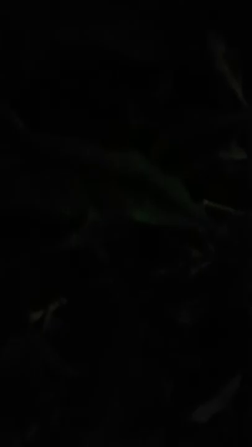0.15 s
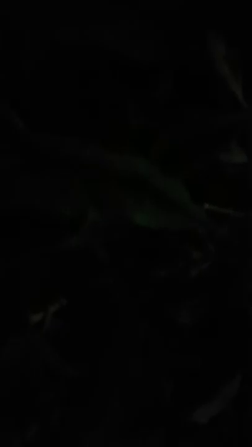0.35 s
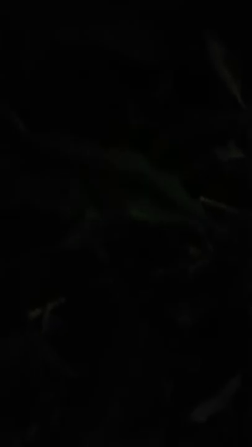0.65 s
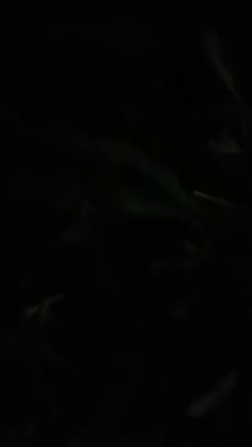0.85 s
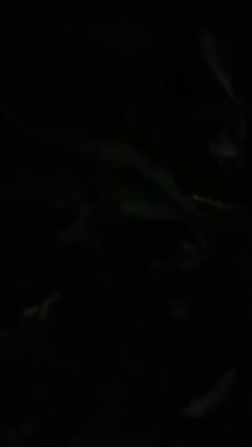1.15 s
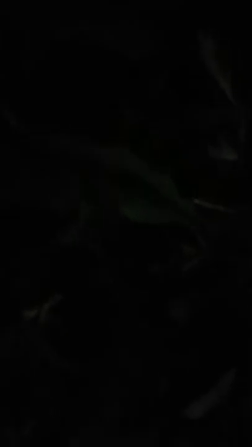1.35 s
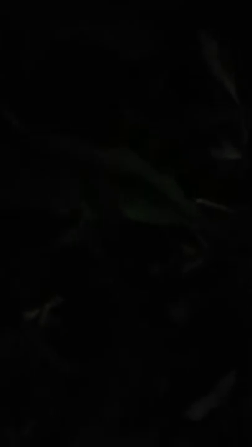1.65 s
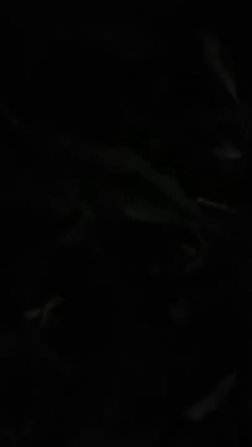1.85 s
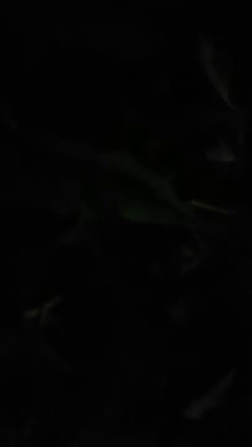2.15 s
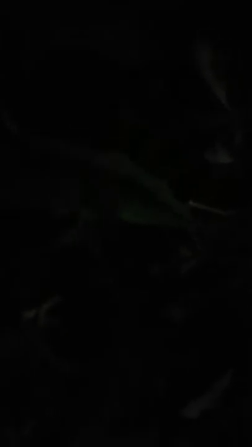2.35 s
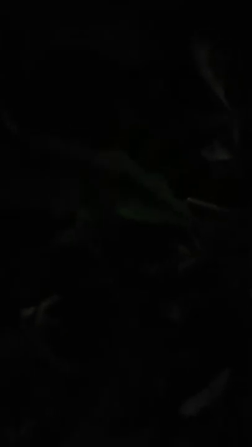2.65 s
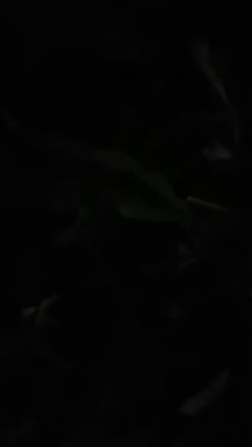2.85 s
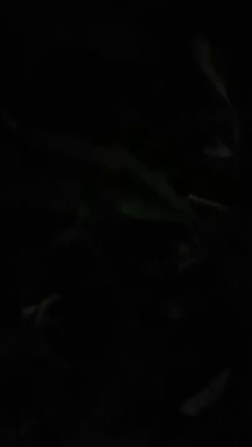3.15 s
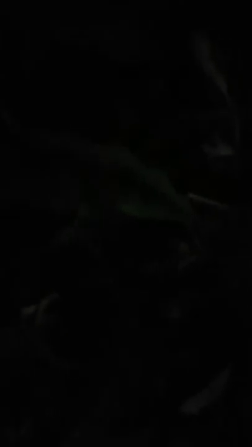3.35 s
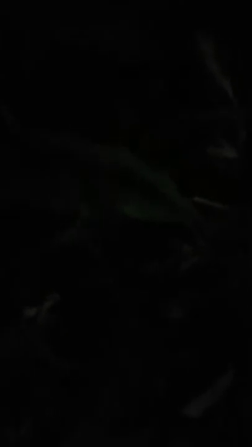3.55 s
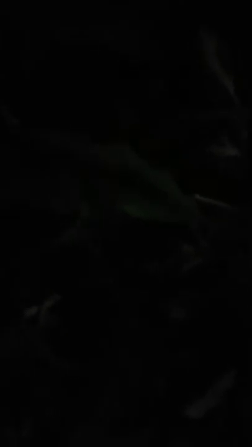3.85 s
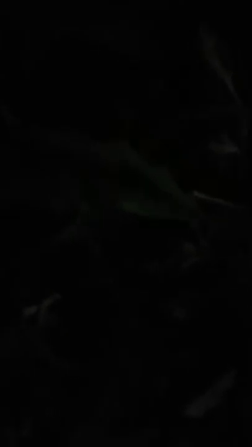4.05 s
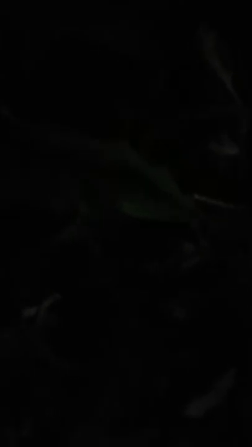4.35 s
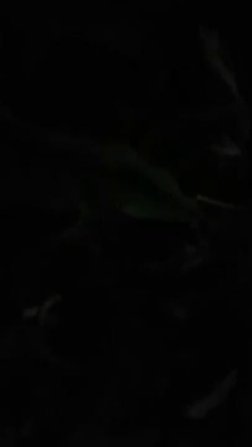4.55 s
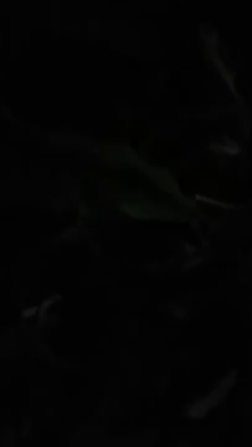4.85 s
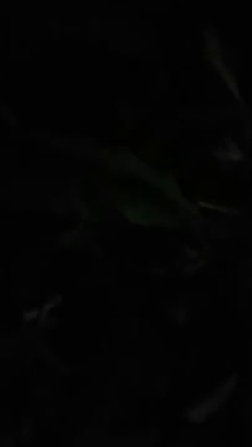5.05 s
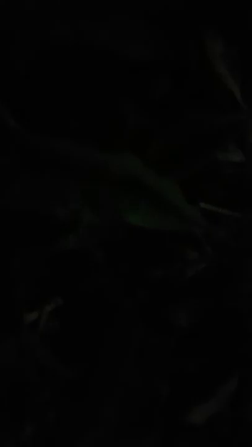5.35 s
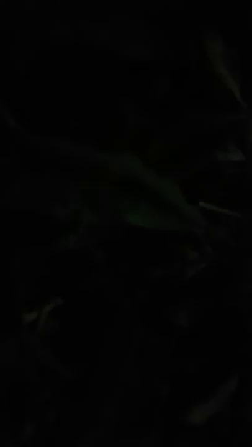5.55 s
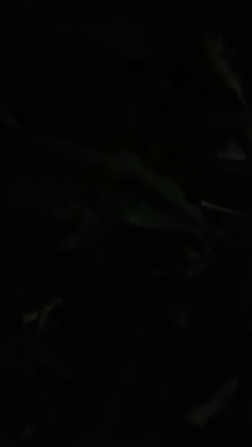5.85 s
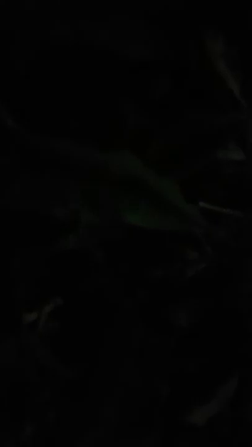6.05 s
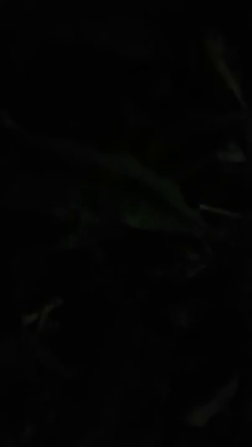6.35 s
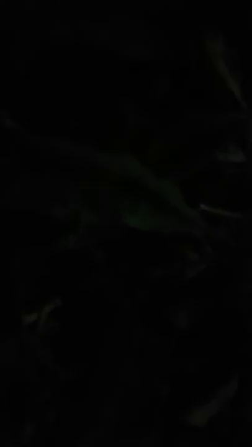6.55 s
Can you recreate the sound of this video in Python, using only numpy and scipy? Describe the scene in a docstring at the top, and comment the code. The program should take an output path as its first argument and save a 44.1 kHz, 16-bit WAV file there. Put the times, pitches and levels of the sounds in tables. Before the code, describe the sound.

Outdoors at night, about sixteen tree frogs call close by, each repeating a short low chirp then a longer, arching high whistle roughly once a second. Countless distant frogs blur into a shimmering wash behind them. A thin insect trill, soft air hiss and low motor hum continue throughout; one small dull tap comes early. Two close microphones give a wide, nearly dry stereo picture, with the high notes leaning right.

```python
"""Tree frogs at night

Each frog sings two whistled notes: a short low "co", then a longer, arching high "qui".
Sixteen frogs call near by and many more far off, blurring into a faint wash; all are gliding tones.
A thin insect trill, the hiss of the air and a distant rumble are shaped noise; motors hum as steady tones.
Short whistles, low hoots, one small tap and two passing drones join in, heard by two close microphones."""
import sys
import numpy as np
from scipy import signal
from scipy.fft import rfft, irfft, next_fast_len
from scipy.io import wavfile
from scipy.ndimage import map_coordinates

SR = 44100
rng = np.random.default_rng(int(sys.argv[2]) if len(sys.argv) > 2 else 0)


def master(y):
    """Save y as 16-bit WAV."""
    cut = np.clip(np.atleast_2d(y).T, -1, 1)
    pcm = np.round(cut * 32767)  # scale
    wavfile.write(sys.argv[1], SR, pcm.astype(np.int16))


N = 295029  # length of the scene in samples
SIDES = np.array([[.5], [-.5]])  # shares a left-right difference between left and right


def amp(db):
    """Turn decibels into a multiplier."""
    return 10 ** (np.asarray(db) / 20)


def unit(x):
    """Scale a sound to an rms of 1."""
    return x / np.sqrt(np.mean(x ** 2) + 1e-20)


def along(points, hz):
    """Read a curve of (Hz, value) points, joined by straight lines on a log frequency axis."""
    f, value = np.transpose(points)
    return np.interp(np.log(hz + 1), np.log(f + 1), value)


def wobble(rate, size=N):
    """A smooth random curve with `rate` random points a second."""
    knots = rng.standard_normal(int(size * rate / SR) + 4)
    coarse = np.arange(0, size, 64)
    smooth = map_coordinates(knots, [coarse * rate / SR])
    return np.interp(np.arange(size), coarse, smooth)


def flutter(rate, size):
    """A random zigzag with `rate` random points a second."""
    knots = rng.standard_normal(int(size * rate / SR) + 2)
    return np.interp(np.arange(size) * rate / SR, np.arange(len(knots)), knots)


def filtered(x, response):
    """Make each frequency of a sound stronger or weaker, as `response` tells."""
    m = next_fast_len(N + SR // 2)
    spectrum = rfft(x, m) * response(np.fft.rfftfreq(m, 1 / SR))
    return irfft(spectrum, m)[..., :N]


def add(track, s, sound):
    """Mix a sound into the track at time s, dropping what falls outside."""
    start = round(s * SR)
    a, b = max(start, 0), min(start + sound.shape[-1], N)
    if b > a:
        track[:, a:b] += sound[..., a - start:b - start]


# How alike the noise is at the two microphones: (f/Hz, likeness from 0 to 1)
LIKENESS = [(150, 0.96), (300, .74), (550, 0.62), (1100, 0), (3000, 0.37)]


def rush(spectrum):
    """Stereo noise of rms 1: a shared part and an opposed part make it most alike in the bass."""
    def turn(hz):
        return np.arccos(np.clip(along(LIKENESS, hz), -1, 1)) / 2

    def shape(hz):
        return amp(along(spectrum, hz)) * [np.cos(turn(hz)), np.sin(turn(hz))]

    mid, side = filtered(rng.standard_normal((2, N)), shape)
    return unit(np.array([mid + side, mid - side]))


def rasp(size, low_hz=3900, high_hz=4900):
    """A short stereo puff of noise from one band of pitches, rms 1."""
    m = next_fast_len(size)
    offset = (2 * np.fft.rfftfreq(m, 1 / SR) - low_hz - high_hz) / (high_hz - low_hz)
    spectrum = rfft(rng.standard_normal((2, m))) / (1 + offset ** 4)
    return unit(irfft(spectrum, m)[:, :size])


def leaves(x, t60=.07):
    """Foliage close by returns each call within a few hundredths of a second, so gliding notes beat."""
    t = np.arange(SR // 10) / SR
    tail = rng.standard_normal((2, len(t))) * amp(-60 * t / t60) * (t > .003)
    return signal.fftconvolve(x, tail / np.linalg.norm(tail[0]), axes=1)[:, :N]


def trees(x, t60):
    """Trunks and leaves scatter a short diffuse tail, different at each microphone; t60 = s to fall 60 dB."""
    t = np.arange(SR // 2) / SR
    build_up = 1 - np.exp(-t / .024)
    tail = rng.standard_normal((2, len(t))) * amp(-60 * t / t60) * build_up
    return signal.fftconvolve(x.mean(0)[None], tail / np.linalg.norm(tail[0]), axes=1)[:, :N]


def whistle(pitch_hz, envelope, overtones, pan_db, lead_ms, jitter=.0008, shimmer_db=.7, flutter_db=4.5):
    """A vocal sac rings as a nearly pure tone with fluttering overtones; a lead puts one microphone first."""
    size = len(pitch_hz)
    hz = pitch_hz * (1 + jitter * flutter(150, size=size))
    lead_cycles = SIDES * hz * lead_ms / 1000
    phase = 2 * np.pi * (np.cumsum(hz) / SR + lead_cycles)
    tone = np.sin(phase)
    for multiple, db in overtones:
        strength = amp(db + flutter_db * flutter(170, size=size))
        tone = tone + strength * np.sin(round(multiple) * phase)
    shimmer = amp(shimmer_db * flutter(94, size=size))
    return tone * envelope * amp(SIDES * pan_db) * shimmer


# Low-note overtones, before strain and voice change them: (multiple of the pitch, level/dB below the pitch)
LOW_OVERTONES = [(2, -28), (3, -34), (5, -49)]


def co(length, hz, db, pan_db, lead_ms, sag, flick, overtone_db, hook=.025, fade_db=3.5, attack=.0095,
       choke_db=17, strain_db=5, rasp_db=-32, vary=.45):
    """The low note starts abruptly, sags, hooks up and is choked off in an upward flick; each one varies."""
    flick_time, overrun = .013, .004  # s
    t = np.arange(int((length + overrun) * SR)) / SR
    u = np.minimum(t / length, 1)  # progress through the note, 0 to 1
    left = t[-1] - t
    closing = np.maximum(1 - left / flick_time, 0)  # climbs to 1 during the flick

    slack, force = 1 + vary * rng.uniform(-1, 1, 2)
    sagging = slack * sag * (1 - u) ** 2
    pitch = hz * (1 + sagging + hook * u ** 5 + force * flick * closing ** 2)

    edges = np.clip(np.minimum(t / attack, left / .0015), 0, 1)
    gate = np.sin(np.pi / 2 * edges) ** 2
    envelope = gate * amp(db - fade_db * u - choke_db * closing ** 3)

    overtones = []
    for multiple, level in LOW_OVERTONES:
        # the octave gains on the others in the flick
        change = strain_db * closing if multiple < 3 else overtone_db - strain_db * closing
        overtones.append((multiple, level + change))
    tone = whistle(pitch, envelope, overtones, pan_db, lead_ms, jitter=.003, shimmer_db=1.7)
    rasp_level = amp(db + rasp_db + pan_db * SIDES) * np.sin(np.pi * closing)
    return tone + rasp_level * rasp(len(t))


# High-note overtones, before they flutter: (multiple of the pitch, level/dB below the pitch)
HIGH_OVERTONES = [(2, -46), (3, -58)]


def qui(length, hz, db, pan_db, lead_ms, scoop, droop, swell_db, roundness, sweep, edge=.008, sweep_db=-16):
    """The high note sweeps up to pitch from far below, swells along an arch, droops and dies away."""
    sweep_time = .022  # s
    t = np.arange(int(length * SR)) / SR
    u = t / length  # progress through the note, 0 to 1
    opening = np.maximum(1 - t / sweep_time, 0)  # falls to 0 during the sweep
    arch = 1 - scoop * (1 - u) ** 4 - droop * u ** 5
    pitch = hz * (arch - rng.uniform(.85, 1.15) * sweep * opening ** 3)

    onset = (1 - np.exp(-t / edge)) ** 2
    body = np.sin(np.pi * u) ** roundness * onset * amp(swell_db * (u - .5))
    start = amp(sweep_db) * np.sqrt(opening)  # the tone is already there, weakly, during the sweep
    edges = np.clip(np.minimum(t / .003, (length - t) / .006), 0, 1)
    gate = np.maximum(body, start) * edges
    return whistle(pitch, amp(db) * gate, HIGH_OVERTONES, pan_db, lead_ms)


def far_frogs(count=170, co_hz=2200, qui_hz=4000, co_db=-46, qui_db=-42.5, pan_db=-3, echo_db=-5,
              scoop=.03, droop=.018, flick=.08):
    """Many more frogs call at random; bigger ones sing both notes lower and hardly flick."""
    size_spread, level_spread_db = .033, 4
    low, high = np.zeros((2, N)), np.zeros((2, N))
    starts = (np.arange(count) + rng.random(count)) / count * (N / SR + .5) - .5  # s
    # smallness, loudness, side, pace and lilt each run from -1 to 1
    for s, (small, loud, side, pace, lilt) in zip(starts, rng.uniform(-1, 1, (count, 5))):
        scale = 1 + size_spread * (small + small ** 3)
        place = level_spread_db * loud, pan_db + 6 * side, .31 * side  # level dB, left-right dB, lead ms
        low_length, high_length = .052 + .018 * pace, .18 + .026 * pace  # s
        sag, sweep = .025 * (1 + lilt), .04 * (1 + lilt)
        add(low, s, co(low_length, co_hz * scale, *place, sag, flick * (1 + small) / 2, 0))
        high_note = qui(high_length, qui_hz * scale, *place, scoop, droop, 0, .6, sweep)
        add(high, s + low_length, high_note)
    frogs = amp(co_db) * unit(low) + amp(qui_db) * unit(high)
    return frogs + amp(echo_db) * trees(frogs, t60=.6)


# Spectrum of calls blurred by distance: (f/Hz, relative level/dB per Hz)
FAR_CALL_SPECTRUM = [(1900, -44), (2050, -2), (2220, -5), (2400, -16), (2650, -31.5), (3300, -32),
                     (3680, -3.5), (3950, -9), (4250, -13), (4500, -7.5), (4850, -42)]


def farthest_frogs(db=-54, pan_db=-3, swell_db=2):
    """Deep in the trees the calls merge into a faint flickering noise around the two note pitches."""
    level = amp(db + swell_db * wobble(22) + pan_db * SIDES)
    return level * rush(FAR_CALL_SPECTRUM)


# Spectrum of the insect trill: (f/Hz, relative level/dB per Hz)
TRILL_SPECTRUM = [(7000, -24), (7550, -20), (7800, -6), (7915, 0), (8080, -17), (8165, 0.5), (8240, -5),
                  (8330, -24), (8800, -46)]


def insects(db=-67.5, pan_db=-8, flutter_db=1.2):
    """A thin trill of many insects, off to the right: fluttering noise in a narrow high band."""
    level = amp(db + flutter_db * wobble(18) + pan_db * SIDES)
    return level * rush(TRILL_SPECTRUM)


# Steady tones of the motors: (f/Hz, rms level/dB before it wavers)
HUM_LINES = [(59, -66.5), (129, -60.5), (169, -52.5), (236, -62.5), (279, -64), (354, -67.5), (1070, -78)]
# Spectrum of the rumble under them: (f/Hz, relative level/dB per Hz)
RUMBLE_SPECTRUM = [(15, -56), (25, -27), (54, -1.5), (119, -2), (139, -8), (170, -1.5), (203, -4.5),
                   (230, -9.5), (312, -14), (347, -14), (563, -14), (805, -19), (1800, -24), (2340, -65),
                   (3960, -120)]


def machinery(waver_db=2, drift=.8, rumble_db=-48):
    """Distant motors: hum tones, wavering in level and drifting in phase (rad), over low rumbling noise."""
    t = np.arange(N) / SR
    hum = np.zeros(N)
    for hz, db in HUM_LINES:
        level = amp(db + waver_db * wobble(6)) * np.sqrt(2)  # a sine peaks at root 2 times its rms
        hum += level * np.sin(2 * np.pi * hz * t + drift * wobble(7))
    return hum + amp(rumble_db) * rush(RUMBLE_SPECTRUM)


# Spectrum of the night air: (f/Hz, relative level/dB per Hz)
AIR_SPECTRUM = [(300, -29.5), (1000, -10), (1800, -16), (3000, 6), (4400, 0), (5200, -19), (5900, -15),
                (6500, -5), (7500, -12), (9500, -18), (12000, -13), (15500, -12.5)]


def night_air(db=-65.5):
    """The soft hiss of the night air, as steady shaped noise."""
    return amp(db) * rush(AIR_SPECTRUM)


# Each near frog's low note, by frog: (length/s, f/Hz, left-right level/dB, left lead/ms,
# typical opening sag and closing flick as shares of the pitch, upper overtones level/dB)
LOW_NOTES = {"deep": (.063, 2098, 10.5, .4, .016, .04, 2), "bright": (.064, 2178, -4.3, -.2, .047, .11, -3),
             "sharp": (.066, 2225, -14, -.41, .04, .06, -18),
             "steady": (.07, 2238, 2.5, .25, .019, .11, -12),
             "deepest": (.066, 2040, -10.5, -.03, .018, .02, -1),
             "shrill": (.064, 2200, -.5, .05, .055, .16, -2),
             "middle": (.06, 2228, -3.5, .07, .022, .13, 0), "soft": (.058, 2110, 4, -.1, .012, .12, 3),
             "mellow": (.066, 2130, -3, -.06, .022, .08, 2), "level": (.058, 2198, 3.5, .06, .02, .12, -3),
             "slow": (.066, 1996, 0, -.04, .014, .02, -10), "thin": (.062, 2265, -3, 0, .04, .19, -5),
             "plain": (.065, 2250, -5, -.1, .025, .14, -3), "tiny": (.055, 2340, -9, -.1, .02, .17, -3),
             "large": (.066, 2030, -2, 0, .015, .03, 0), "piping": (.054, 2370, -5, -.1, .025, .19, -5)}
# Its high note, by frog: (delay after the call starts t/s, length/s, f/Hz, left-right level/dB, left lead/ms,
# opening scoop and closing droop as shares of the pitch, swell level/dB, roundness of the level arch 0-1,
# typical entry sweep as share of the pitch)
HIGH_NOTES = {"deep": (.062, .192, 3673, -2.1, -.105, .03, .003, 1, .36, .13),
              "bright": (.064, .203, 3942, -15, -.13, .04, .022, 4, .7, .13),
              "sharp": (.07, .16, 4240, -7, -.3, .022, .026, 0, .7, .04),
              "steady": (.063, .222, 4028, -11.5, -.21, .052, .004, 5, .45, .24),
              "deepest": (.068, .17, 3700, -3.5, -.08, .02, .012, 0, .4, .09),
              "shrill": (.068, .21, 4330, -5, -.08, .05, .035, 1, .36, .08),
              "middle": (.06, .178, 4105, -3.5, -.06, .03, .03, 3, .6, .2),
              "soft": (.062, .185, 3845, -8.5, -.31, .03, .028, 0, .36, .18),
              "mellow": (.066, .198, 3865, -6, -.3, .028, .036, 0, .36, .17),
              "level": (.066, .196, 3975, -4, -.1, .022, .008, 1, .36, .13),
              "slow": (.072, .16, 3840, -7, -.2, .022, .02, 0, .36, .1),
              "thin": (.07, .195, 4370, -7.5, -.08, .052, .025, 0, .4, .1),
              "plain": (.07, .165, 4108, -12, -.09, .012, .01, 0, .36, .1),
              "tiny": (.07, .18, 4408, -10, -.08, .012, .004, 0, .36, .06),
              "large": (.07, .14, 3520, -3, -.05, .025, .025, 0, .5, .06),
              "piping": (.07, .17, 4200, -7, -.1, .025, .02, 0, .36, .08)}
# When each frog calls, at its own pace: (t/s, low note level/dB, high note level/dB before a small lift,
# high note's distance from its usual pitch f/Hz)
FROG_CALLS = { "deep": [(.496, -29.5, -23.5, 5), (1.668, -29, -23, 0), (2.736, -27, -22, 0),
              (3.736, -28.5, -21.5, 0), (4.771, -28.5, -22.5, 0), (5.838, -27.5, -24, -5)],
              "bright": [(.482, -27, -28.5, -20), (1.553, -25, -28.5, -15), (2.853, -25.5, -28, -5),
              (3.779, -26.5, -28, 5), (4.906, -25, -27, 5), (5.82, -32, -26.5, 0)],
              "sharp": [(.068, -27, -34, -5), (1.165, -27.5, -34.5, 10), (2.3, -28.5, -36.5, 5),
              (3.455, -27.5, -37.5, -25), (4.607, -25.5, -37, 0), (5.793, -27, -34, 5)],
              "steady": [(.212, -27.5, -35, -5), (1.293, -27.5, -33.5, -5), (2.404, -26, -34, -10),
              (3.428, -30, -32, 0), (4.496, -25, -31.5, 5), (5.57, -25, -30.5, 30), (6.616, -26, -42, 0)],
              "deepest": [(.53, -33, -40, 0), (1.545, -34.5, -33, 5), (2.614, -33, -37.5, -10),
              (3.655, -34.5, -40, 0), (4.832, -33.5, -42, 0), (5.978, -34.5, -37, 0)],
              "shrill": [(.66, -27.5, -33.5, 0), (1.849, -33, -43, -20), (3.005, -28, -39, -10),
              (3.88, -30.5, -36.5, 10), (4.945, -35, -35, -70), (5.981, -31.5, -44, 60)],
              "middle": [(.942, -31, -33.5, -90), (2.008, -34, -33.5, -40), (3.03, -33, -31, 20),
              (4.138, -32.5, -32, 0), (5.147, -33, -32.5, 10), (6.184, -33, -33.5, -30)],
              "soft": [(-.1, -40, -38, 0), (.82, -38, -36, -5), (2.02, -39, -37, 10), (3.02, -41, -39, -10),
              (4.099, -38, -39, -45), (5.095, -41, -34.5, 65), (6.241, -38.5, -38, 75)],
              "mellow": [(.272, -35.5, -45, -50), (1.416, -35, -42, -70), (2.589, -33.5, -37.5, 5),
              (3.66, -33, -34, -10), (4.671, -34.5, -33, -15), (5.67, -42, -34.5, 20),
              (6.595, -43, -40, 0)], "level": [(-.12, -38, -31, 0), (.69, -36, -35.5, 10),
              (1.885, -31.5, -38, -20), (2.235, -39, -33.5, 20), (3.278, -34.5, -39, 0),
              (4.226, -32, -40, -25), (5.456, -32.5, -41, -40), (6.3, -37, -35, 5)],
              "slow": [(.235, -38.5, -43, -20), (1.687, -40.5, -36, 20), (2.728, -38, -44, 0),
              (3.912, -39.5, -44, 0), (4.964, -38.5, -43, 0), (6.405, -39.5, -41, -10)],
              "thin": [(-.06, -42, -48, 20), (1.388, -35, -47, 20), (2.545, -36, -46, 20),
              (2.73, -44, -37, -15), (3.255, -37, -44, -130), (3.695, -36, -46, 0), (4.41, -41, -42, -130),
              (6.085, -43, -36.5, -60)], "plain": [(.36, -39, -44, 0), (.666, -40, -41, 0),
              (1.55, -42, -41, -20), (1.85, -42, -40, -30), (2.47, -35, -35, 0), (3.522, -37, -36, -10),
              (4.51, -39, -43, 25), (5.7, -35, -39, 0), (6.46, -41, -48, 0)], "tiny": [(.15, -47, -48, -20),
              (1.29, -44, -48, 0), (2.5, -42, -47, -10), (3.67, -45, -48, 0), (4.86, -43, -46, 0)],
              "large": [(.53, -44, -47, -30), (1.555, -44, -41.5, 15), (2.61, -44, -50, 0),
              (3.66, -44, -45, -25)], "piping": [(.955, -43, -42, 0), (2.095, -44, -41, 0),
              (3.19, -42, -42, 0), (3.95, -38, -45, 0), (4.362, -40, -43, 0), (4.81, -38, -44, 0),
              (5.035, -40, -42, 0), (6.12, -40, -40, 50), (6.24, -41, -44, 0)]}


def near_calls(qui_db=.4, detune=.002):
    """Each near frog repeats its own low and high note from its own perch."""
    frogs = np.zeros((2, N))
    for frog, calls in FROG_CALLS.items():
        low_length, low_hz, *low_style = LOW_NOTES[frog]
        delay, high_length, high_hz, *high_style = HIGH_NOTES[frog]
        for s, low_db, high_db, off_hz in calls:
            tuning = 1 + detune * rng.standard_normal()
            add(frogs, s, co(low_length, low_hz * tuning, low_db, *low_style))
            high_note = qui(high_length, high_hz + off_hz, high_db + qui_db, *high_style)
            add(frogs, s + delay, high_note)
    return frogs


# Short rising whistles: (t/s, length/s, start f/Hz, end f/Hz, peak level/dB, octave level/dB below the tone)
RISING_WHISTLES = [(.07, .08, 3100, 3300, -60, -40), (.517, .03, 2650, 3550, -55, -30),
                   (1.012, .025, 2300, 2850, -52, -30), (1.063, .03, 2950, 3600, -57, -30),
                   (1.145, .075, 3120, 3320, -58, -40), (1.462, .016, 2600, 3750, -54, -30),
                   (1.962, .04, 3100, 3680, -53, -30), (3.342, .018, 2250, 3100, -52, -28),
                   (4.15, .1, 2300, 3230, -50, -19), (4.497, .115, 3080, 3490, -43.5, -40),
                   (4.686, .032, 2400, 3550, -53, -30), (5.984, .11, 2310, 2590, -48.5, -9.5),
                   (6.31, .06, 3150, 3330, -57, -40), (6.66, .045, 3200, 3850, -44, -30)]


def rising_whistles():
    """Brief tones glide upward, fast at first, swelling and fading as they go."""
    track = np.zeros((2, N))
    for s, length, start_hz, end_hz, db, overtone_db in RISING_WHISTLES:
        u = np.linspace(0, 1, int(length * SR), endpoint=False)
        pitch = end_hz + (start_hz - end_hz) * (1 - u) ** 2
        envelope = amp(db) * np.sin(np.pi * u)
        add(track, s, whistle(pitch, envelope, [(2, overtone_db)], 0, 0))
    return track


# A distant caller's hoots: (t/s, level/dB)
HOOT_TIMES = [(.78, -56), (2.058, -55), (3.165, -56), (4.42, -55), (5.582, -55)]
# Its one note: (length/s, f/Hz, left-right level/dB, left lead/ms,
# typical sag and flick as shares of the pitch, upper overtones level/dB)
HOOT_NOTE = (.155, 1945, -2.5, 0, .004, 0, -10)


def hoots():
    """A distant caller holds one long, low, almost even note."""
    track = np.zeros((2, N))
    length, hz, *style = HOOT_NOTE
    for s, db in HOOT_TIMES:
        add(track, s, co(length, hz, db, *style, hook=.005))
    return track


def calls_among_leaves(leaves_db=-20, echo_db=-18):
    """Near calls, whistles and hoots, almost dry, with faint echoes from foliage and trees."""
    calls = near_calls() + rising_whistles() + hoots()
    return calls + amp(leaves_db) * leaves(calls) + amp(echo_db) * trees(calls, t60=.5)


def tap(s=.8517, db=-26, thump_hz=130, decay=.0011, click_db=-37):
    """One small tap near the microphones: a dull click of noise and a short, dying low thump."""
    t = np.arange(SR // 20) / SR
    track = np.zeros((2, N))
    fade = np.exp(-t / decay) * (1 - np.exp(-t / .0001))
    thump = amp(db) * np.cos(2 * np.pi * thump_hz * t) * fade
    click = amp(click_db) * rng.standard_normal((2, len(t))) * np.exp(-t / .0006)
    dull_click = signal.lfilter(*signal.butter(1, 2000, fs=SR), click)
    add(track, s, thump + dull_click)
    return track


# Passing drones: (loudest t/s, span/s from there to 1/e of the loudness, f/Hz, width f/Hz,
# rms level/dB at the loudest)
DRONE_SWELLS = [(4.353, 0.83, 126.7, 12, -51.5), (5.802, 1, 79.2, 25, -52)]


def drones():
    """Narrow bands of low noise swell and fade in the distance."""
    t = np.arange(N) / SR
    track = np.zeros(N)
    for s, span, hz, width, db in DRONE_SWELLS:
        noise = rng.standard_normal(N)
        band = unit(filtered(noise, lambda f: np.exp(-((f - hz) / width) ** 2)))
        track += amp(db) * np.exp(-((t - s) / span) ** 2) * band
    return track


def scene():
    """Frogs, insects and machinery over the soft hiss of the night air."""
    chorus = far_frogs() + farthest_frogs() + calls_among_leaves()
    return chorus + insects() + machinery() + night_air() + tap() + drones()


def record(dry, top_hz=15800):
    """The recorder keeps nothing above its band limit."""
    return filtered(dry, lambda hz: hz < top_hz)


dry = scene()
out = record(dry)
master(out)
```